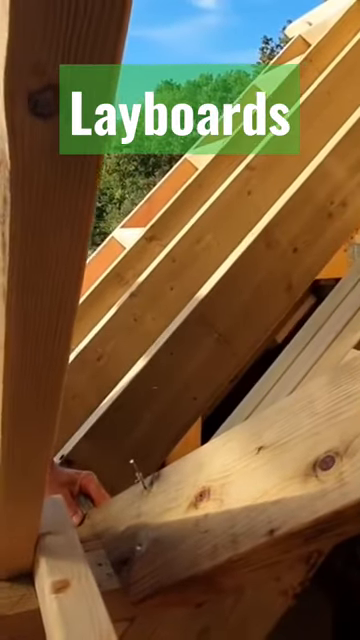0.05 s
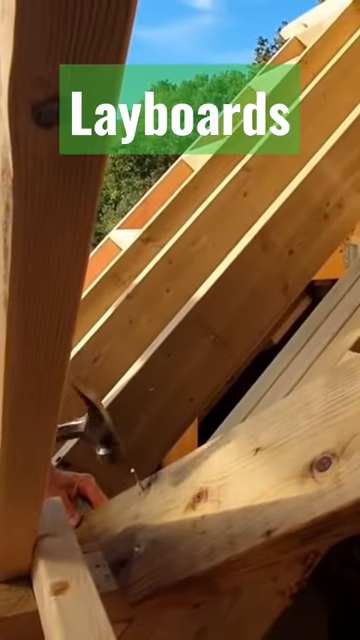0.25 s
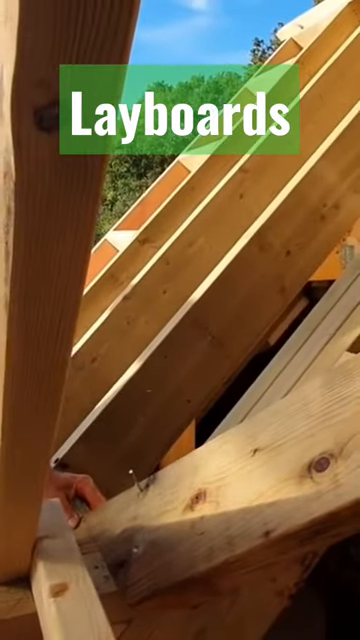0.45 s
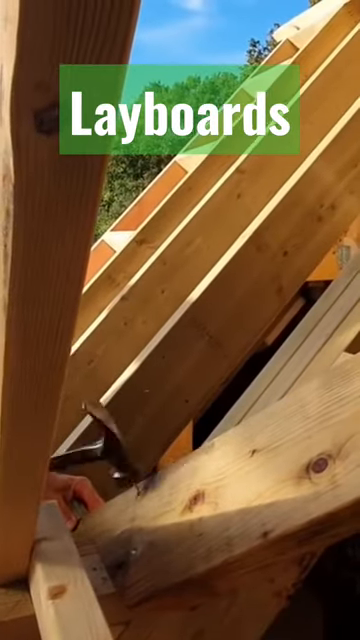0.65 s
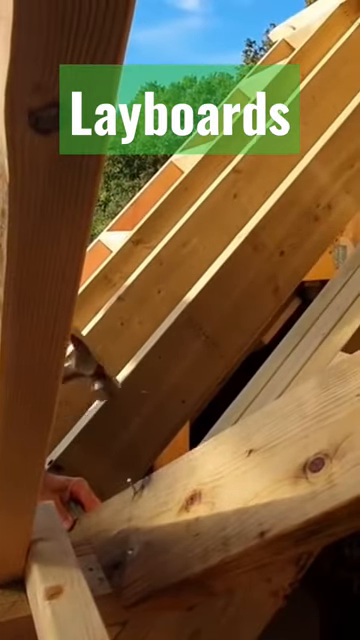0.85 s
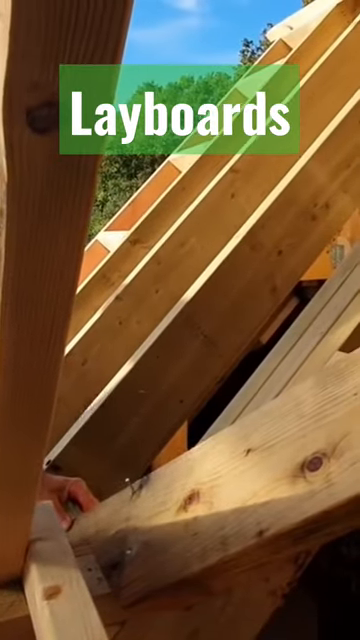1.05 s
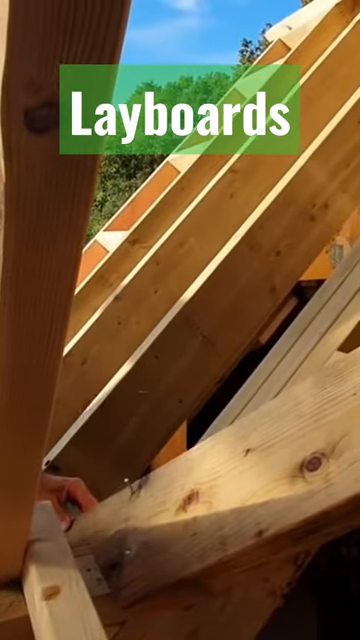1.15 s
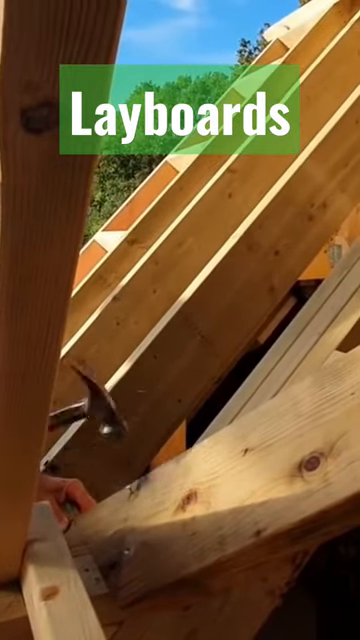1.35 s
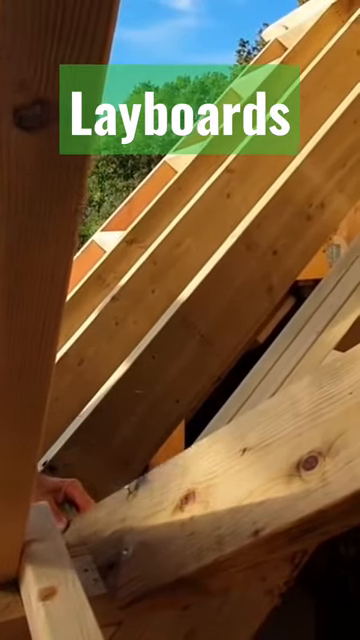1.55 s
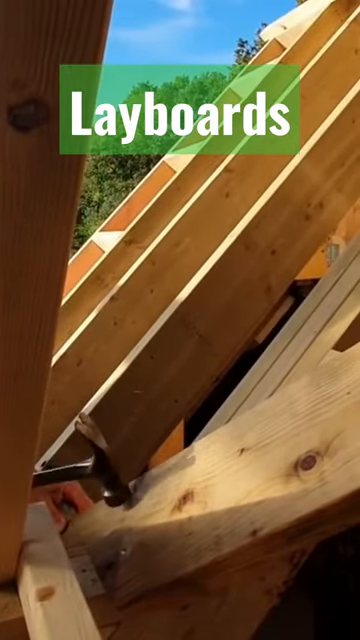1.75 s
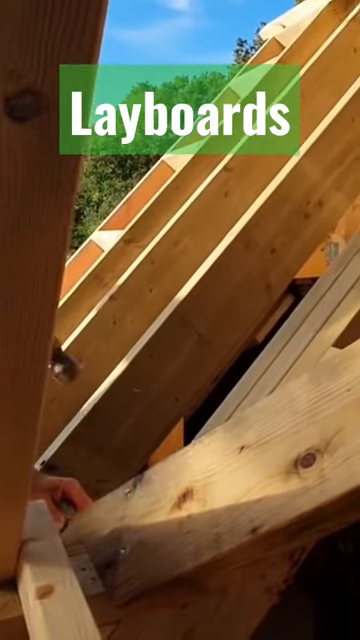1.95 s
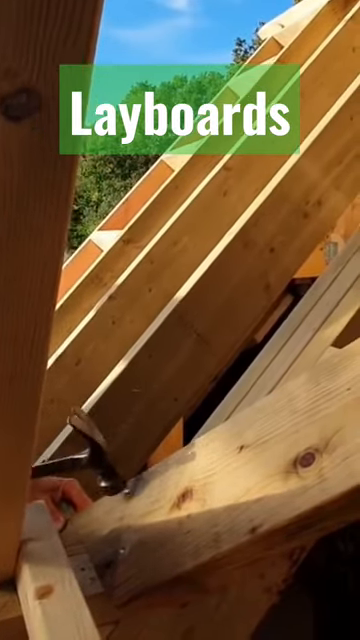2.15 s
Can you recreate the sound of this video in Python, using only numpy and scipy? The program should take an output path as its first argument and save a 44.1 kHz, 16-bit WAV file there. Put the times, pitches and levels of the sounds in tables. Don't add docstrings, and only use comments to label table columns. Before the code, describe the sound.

Hammer blows on a nail in solid timber, close and dry, at about 0.2, 0.75, 1.3 and 1.8 seconds. Each has a hard steel crack, tiny nail ring and short hollow knock; the wood tone climbs as the nail sinks. A clear dull rebound follows at 0.8, fainter ones at 1.33 and 1.85. Short open-air tail, low distant traffic, barely audible bird whistles, peaks squeezed.

```python
import sys
import numpy as np
from scipy import signal
from scipy.fft import rfft, irfft
from scipy.io import wavfile
from scipy.ndimage import uniform_filter1d, minimum_filter1d

SR = 44100
rng = np.random.default_rng(int(sys.argv[2]) if len(sys.argv) > 2 else 0)


def to_wav(sig):
    pcm = np.clip(np.atleast_2d(sig), -1, 1) * 32767
    pcm = np.round(pcm).astype(np.int16)
    wavfile.write(sys.argv[1], SR, pcm.T)


def boost(x):
    u = np.asarray(x, float) / 20
    return 10 ** u


N = 97020

# start_s, knock_db, board_db, ring_length_share
BLOWS = [
    (0.2037, -8, 9.5, 0.9),
    (0.7507, -8, 3.5, 0.92),
    (1.2987, -10, 5.5, 0.74),
    (1.8240, -12.5, 1, 0.71),
]
# crack_db, nail_hz, nail_db, second_hz, second_db (a second ring of the nail)
STEEL_BLOWS = [(-9, 9400, -23, 5000, -28.5), (-6.5, 9000, -15.5, 5800, -28),
               (-8, 6500, -18.5, 11000, -23.5), (-7.5, 4800, -22, 11500, -28)]
# start_s, knock_db, board_db, ring_length_share
REBOUNDS = [
    (0.8050, -10, 3, .3),
    (1.328, -25, -12, .6),
    (1.853, -23, -14, .7),
]
# lower_hz, lower_db, upper_hz, upper_db
JOINT_MODES = [
    (324, -3.5, 581, 3),
    (369.2, 3.5, 578, 1.5),
    (377.7, 3, 636.6, 4),
    (428.6, 4, 645.3, 7.5),
]
JOINT_T60_S = 0.1, 0.069
# mode_hz, level_db, t60_s
RAFTER_MODES = [(95, -34, .2), (135, -28, .12), (208, -20, .09), (270, -17, .1), (712, -6, .04),
                (940, -15, .05), (1145, -12, .11), (1420, -13, .13), (1515, -12, .08), (1650, -13, .06),
                (1745, -14, .1), (1992, -12, .07), (2240, -14, .05), (2490, -18, .05)]
# frequency_hz, density_db (per Hz)
CRACK_SPECTRUM = [(500, -5.5), (1500, 7), (3300, -4.5), (6000, -8), (10000, -15.5), (14000, -24.5),
                  (16500, -25)]
# band_hz, level_db, t60_s
WALL_RETURNS = [(61, -50, 0.52), (144, -42.5, 0.61), (430, -31, 0.32), (1060, -31.5, 0.44),
                (2200, -39, 0.58), (5000, -47.5, .55), (10500, -47.5, 0.36), (15000, -63, .26)]
# frequency_hz, density_db (per Hz)
TOWN_SPECTRUM = [(25, -2), (90, 4), (160, -8.5), (260, -4.5), (1300, -9), (2600, -28.5), (6000, -34.5),
                 (16000, -49.5)]
# start_s, length_s, pitch_hz, level_db, waver_hz
BIRD_CALLS = [
    (0.0, .22, 4830, -82, 25),
    (0.0, .22, 4330, -82, 130),
    (1.15, .15, 4600, -93, 80),
    (1.64, .18, 7580, -87, 60),
]


def shape(table, hz, col=1):
    table = np.array(table)
    log_hz = np.log(np.maximum(hz, 1))
    return np.interp(log_hz, np.log(table[:, 0]), table[:, col])


def coloured(table, size):
    hz = np.arange(size // 2 + 1) * SR / size
    spectrum = rfft(rng.standard_normal(size)) * boost(shape(table, hz))
    x = irfft(spectrum, size)
    return x / np.std(x)


def fade(t, t60):
    return np.exp(-np.log(1000) * t / t60)


def walk(rate_hz):
    hold = int(SR / rate_hz)
    x = np.repeat(rng.standard_normal(N // hold + 1), hold)
    x = uniform_filter1d(uniform_filter1d(x, hold), hold)[:N]
    return x / np.std(x)


def add(out, start_s, x):
    i = int(round(start_s * SR))
    out[i:i + len(x)] += x[:N - i]


def half_octaves(lowest_hz, count):
    bands = []
    for hz in lowest_hz * 2 ** (np.arange(count) / 2):
        edges = [hz / 2 ** .25, hz * 2 ** .25]
        bands.append((hz, signal.butter(2, edges, "band", fs=SR, output="sos")))
    return bands


def knock(knock_db, board_db, length_share, joint, push_s, spread_db):
    t = np.arange(SR // 3) / SR
    lower = (*joint[:2], JOINT_T60_S[0])
    upper = (*joint[2:], JOINT_T60_S[1])
    board = (831.2, board_db, 0.051)
    modes = np.array([lower, upper, board] + list(RAFTER_MODES))

    luck = rng.standard_normal((len(modes), 3))
    luck[:3, :2] = 0
    hz = modes[:, :1] * (1 + .004 * luck[:, :1])
    gain = boost(modes[:, 1:2] + 1.5 * luck[:, 1:2]) * np.sign(luck[:, 2:])

    short = t[:SR // 25]
    spread_s = .005
    scatter = rng.standard_normal(len(short)) * np.exp(-short / spread_s)
    force = boost(spread_db) * scatter / np.sqrt(np.sum(scatter ** 2))
    force[0] += 1

    share = np.abs(rfft(force, SR))[hz.astype(int)]
    gain = gain / np.maximum(share, .4)
    build_cycles = 3.5
    gain = gain * np.where(hz < 900, 1 - np.exp(-t * hz / build_cycles), 1)
    ring = np.sum(gain * np.sin(2 * np.pi * hz * t) * fade(t, length_share * modes[:, 2:]), axis=0)

    push = short * np.exp(-short / push_s)
    blow = np.convolve(force, push / push.sum())[:len(short)]
    return boost(knock_db) * signal.fftconvolve(ring, blow)


def steel(crack_db, nail_hz, nail_db, second_hz, second_db):
    t = np.arange(4096) / SR
    crack_t60_s, shiver_t60_s, nail_t60_s, click_t60_s = .011, .07, 0.01, .0012
    shiver_db, rise_s = -7, 0.00026
    grit = coloured(CRACK_SPECTRUM, size=4096)
    dull = signal.lfilter(*signal.butter(1, 4900, fs=SR), grit[::-1])
    crack = grit * fade(t, crack_t60_s) + boost(shiver_db) * dull * fade(t, shiver_t60_s)
    crack = crack * np.minimum(t / rise_s, 1)

    ring = boost(nail_db) * np.cos(2 * np.pi * nail_hz * t)
    ring = ring + boost(second_db) * np.cos(2 * np.pi * second_hz * t)

    click = boost(9) * ring * fade(t, click_t60_s)
    click[0] += boost(crack_db + 6.5)
    return boost(crack_db) * crack + ring * fade(t, nail_t60_s), click


def wall_returns():
    t = np.arange(SR // 2) / SR
    rise_s, end_s = .003, 0.54
    out = 0
    for hz, sos in half_octaves(45.2, count=18):
        band = signal.sosfilt(sos, rng.standard_normal(len(t)))
        t60_s = np.maximum(shape(WALL_RETURNS, hz, col=2), .05)
        out = out + boost(shape(WALL_RETURNS, hz)) * band / np.std(band) * fade(t, t60_s)
    return out * (1 - np.exp(-t / rise_s)) * np.exp(-(t / end_s) ** 2)


def town():
    swell_db, flicker_db, level_db = .8, 1.2, -59.5
    base = coloured(TOWN_SPECTRUM, size=N)
    swell = walk(3.18)
    out = np.zeros(N)
    for _, sos in half_octaves(22.6, count=20):
        band_db = swell_db * swell + flicker_db * walk(9.52)
        out += signal.sosfilt(sos, base) * boost(band_db)
    return out / np.std(out) * boost(level_db)


def birds():
    out = np.zeros(N)
    for start_s, length_s, pitch_hz, level_db, waver_hz in BIRD_CALLS:
        t = np.arange(int(length_s * SR)) / SR
        pitch = pitch_hz + waver_hz * walk(17)[:len(t)]
        level = boost(level_db + 4 * walk(150)[:len(t)])
        edge = np.minimum(np.minimum(t + .01, length_s - t) / .02, 1)
        add(out, start_s, level * edge * np.sin(2 * np.pi * np.cumsum(pitch) / SR))
    return out


def scene():
    out = town() + birds()
    for (start_s, *blow), joint, metal in zip(BLOWS, JOINT_MODES, STEEL_BLOWS):
        wood = knock(*blow, joint, push_s=.00008, spread_db=-7)
        crack, click = steel(*metal)
        walls = wall_returns()
        add(out, start_s, wood)
        add(out, start_s, crack)
        add(out, start_s, signal.fftconvolve(click, walls))
        add(out, start_s, boost(-24) * signal.fftconvolve(wood, walls))
    for (start_s, *rebound), joint in zip(REBOUNDS, JOINT_MODES[1:]):
        add(out, start_s, knock(*rebound, joint, push_s=0.0001, spread_db=-18))
    return out[None]


def low_pass(x):
    return signal.sosfilt(signal.butter(12, 16780, fs=SR, output="sos"), x)


def record(dry):
    x = signal.sosfilt(signal.butter(2, 59.4, "high", fs=SR, output="sos"), dry)
    x = signal.sosfilt(signal.ellip(6, .3, 22, 15500, fs=SR, output="sos"), x)
    ceiling, release_s = .48, .006
    k = int(release_s * SR / 4) * 2 + 1
    gain = np.minimum(ceiling / (np.abs(x) + 1e-9), 1)
    gain = uniform_filter1d(minimum_filter1d(gain, k), k)
    return low_pass(x * gain)


dry = scene()
out = record(dry)
to_wav(out)
```